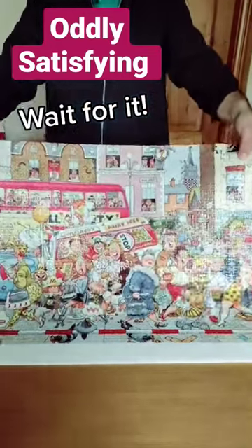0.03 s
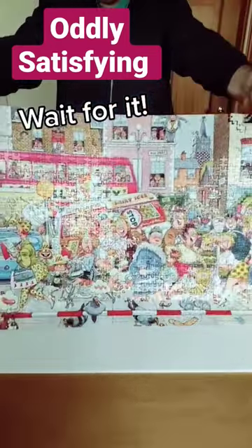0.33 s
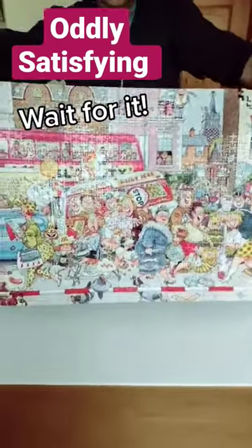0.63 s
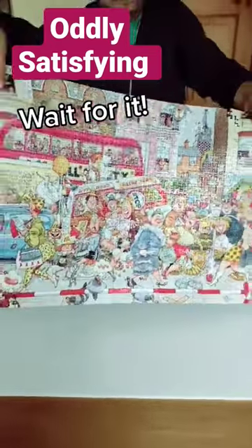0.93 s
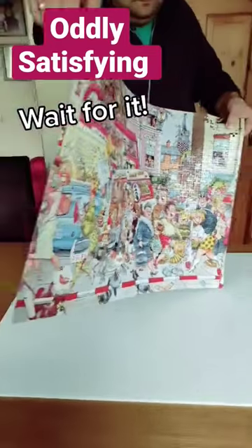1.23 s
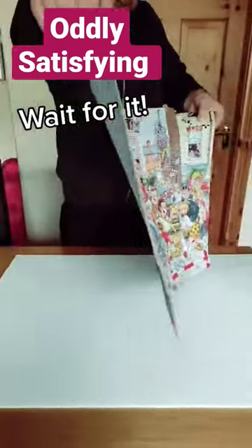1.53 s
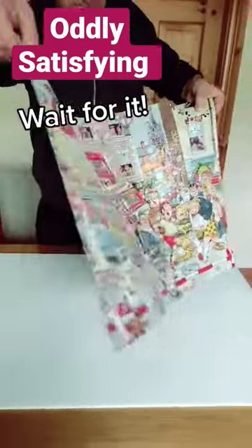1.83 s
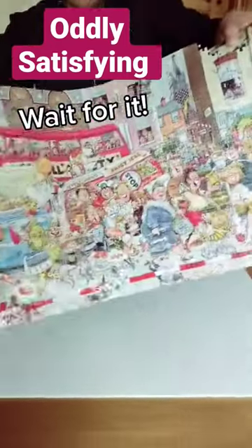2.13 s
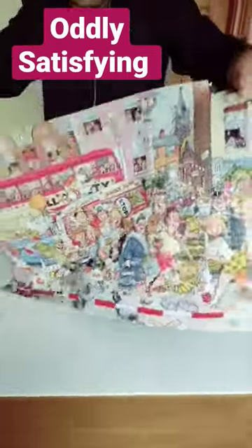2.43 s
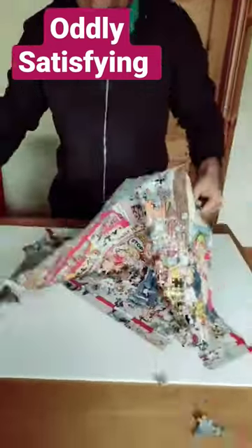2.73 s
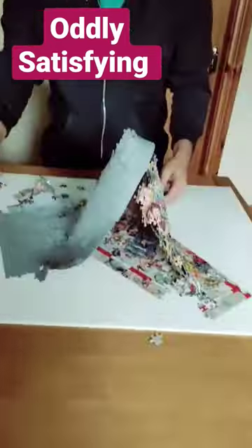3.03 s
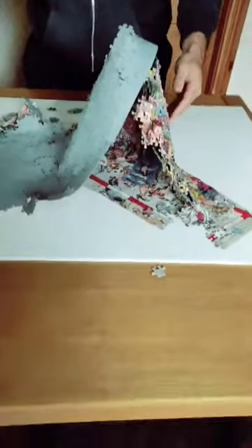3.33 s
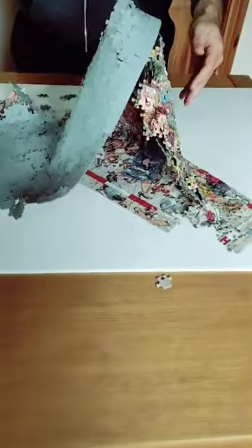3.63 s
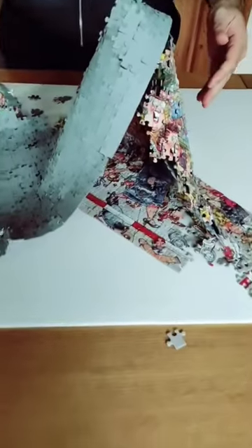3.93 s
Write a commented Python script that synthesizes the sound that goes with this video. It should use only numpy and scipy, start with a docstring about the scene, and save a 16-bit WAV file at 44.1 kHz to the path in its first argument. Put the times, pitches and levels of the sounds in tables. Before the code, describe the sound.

Jigsaw pieces clatter onto a nearby table indoors. Very quiet swishes and small squeaks of the bending puzzle come first, then it slumps down, with clumps shattering into clicks over light knocks and low drumming of the tabletop.

```python
"""Cardboard jigsaw breaking up on a table.

A finished jigsaw is lifted and swung in a small room, with faint swishes, dull rubbing and squeaks.
It slumps onto the table with a thud: clumps land and shatter into clicking pieces, loose pieces
trickle between them, slab edges knock, and the table top drums in its low modes under it all."""
import sys
import numpy as np
from scipy import signal
from scipy.io import wavfile
from scipy.ndimage import uniform_filter1d

SR = 44100
rng = np.random.default_rng(int(sys.argv[2]) if len(sys.argv) > 2 else 0)


def bounce(signal):
    """Save signal as a 16-bit WAV file at the path given by the first command-line argument."""
    frames = np.transpose(np.atleast_2d(signal))
    limited = np.clip(frames, -1, 1)
    pcm = np.round(limited * 32767).astype(np.int16)
    wavfile.write(sys.argv[1], SR, pcm)


N = 176400
T = np.arange(N) / SR

# Handling swishes. Each row: start, rise, release start and release length in seconds, level in dB.
SWISHES = [(0.0, 0.017, 1.15, .3, -72.5), (.18, 0.15, 0.62, .08, -64), (.22, 0.0088, 0.21, 0.043, -68),
           (.52, 0.02, 0.41, 0.062, -68), (1.334, 0.014, 1.61, 0.15, -63), (2.0, 0.16, 3, .1, -70.5),
           (2.525, 0.012, 3.4, 0.033, -68)]
# Swish spectrum. Each row: frequency in Hz, level in dB.
SWISH_SPECTRUM = [(100, -30), (400, -2), (1000, -1.5), (2000, 3), (4000, 1.5), (7000, 4.5), (10000, -3.5),
                  (15000, -4.5)]
# Rubbing of the flexing sheet. Each row: time in seconds, level in dB.
FLEX_ENVELOPE = [(0, -78), (.3, -63.5), (.8, -71), (1.2, -78), (1.55, -83), (1.68, -69.5), (1.85, -76),
                 (2.2, -70.5), (2.5, -69), (2.8, -57)]
# Rubbing spectrum. Each row: frequency in Hz, level in dB.
FLEX_SPECTRUM = [(30, -38), (60, -6), (100, -9.5), (330, 3), (600, -4.5), (1200, -29), (3000, -42)]
# Room background. Each row: frequency in Hz, relative level in dB.
BACKGROUND_SPECTRUM = [(15, -59), (25, -43.5), (86, -7), (309, -4.5), (475, -12.5), (655, -12),
                       (1670, -19.5), (15000, -32)]
# Squeaks of the bending sheet. Each row: start in seconds, starting pitch in Hz, level in dB.
SQUEAKS = [(.19, 2084, -74), (.82, 657, -68), (1.15, 629, -61)]
# Trickle of loose pieces. Each row: time in seconds, level in dB.
TRICKLE_ENVELOPE = [(2.449, -62), (2.68, -43), (2.86, -27.5), (2.89, -17), (3.0, -15), (3.1, -15),
                    (3.15, -7), (3.4, -11.5), (3.479, -18), (3.55, -20.5), (3.64, -16), (3.7, -8),
                    (3.85, -20), (3.92, -18), (4.0, -12.5)]
# Clump landings. Each row: start in seconds, strength in dB, 1/e decay in seconds,
# click centre in Hz, left minus right in dB.
CLUMPS = [(2.616, -22, 0.041, 2240, -2), (2.738, -13, 0.02, 2190, 1), (2.762, -14, 0.0048, 6250, 0),
          (2.850, -8.5, 0.0018, 4200, -3), (2.883, -5, 0.0033, 6200, -8.5), (2.932, -2, 0.037, 6550, -7.5),
          (2.994, 6, 0.057, 3740, -1), (3.018, 1, 0.013, 1570, -6.5), (3.1166, 8.5, 0.0066, 6400, -8),
          (3.126, 10, 0.0095, 5160, 2), (3.165, 6.5, 0.0085, 4860, -5), (3.2, 5, 0.028, 2820, -1),
          (3.238, 10, 0.017, 3480, -3.5), (3.26, 6, .016, 2900, -1.5), (3.302, 4.5, 0.019, 3900, -8),
          (3.32, 0.5, .01, 4520, -2), (3.4268, 8, 0.00089, 3400, -4), (3.436, 3.5, .03, 3660, 1),
          (3.497, -1, 0.005, 3080, 5), (3.571, -2.5, 0.013, 7150, -4.5), (3.579, -3, 0.0035, 1930, 3),
          (3.6579, 7.5, 0.0081, 7000, 0.5), (3.669, -1, 0.046, 8000, -5), (3.722, 2, 0.0054, 5930, -2),
          (3.768, 7, 0.0054, 7250, -6), (3.777, 5.5, 0.007, 7150, 3), (3.787, -0.5, 0.005, 1930, 8.5),
          (3.810, 0.5, 0.025, 7600, -3), (3.888, -4.5, 0.031, 3400, 1), (3.943, -4.5, 0.012, 2320, 5)]
# Click spectrum of a piece. Each row: frequency in Hz, level in dB.
PIECE_SPECTRUM = [(400, -5), (700, 10.5), (1250, 3.5), (1850, 8.5), (2900, 1.5), (4500, 2.5), (6800, 4.5),
                  (9000, -0.5), (11000, -7), (15000, -12)]
# Stereo balance of the clicks. Each row: frequency in Hz, left minus right in dB.
CLATTER_BALANCE = [(270, -1.0), (440, 2), (730, 8.5), (1210, -1.5), (1990, 3), (3290, -0.5), (5420, -3),
                   (8940, 4), (14700, 5.5)]
# Slabs falling flat. Each row: start in seconds, strength in dB, contact time in seconds.
THUDS = [(2.472, -45, 0.0022), (2.547, -45, 0.0011), (2.746, -28.5, .0068), (2.852, -28, 0.0048),
         (2.889, -17.5, 0.0068), (2.905, -12, 0.0051), (3.504, -18.5, .002), (3.6517, -13.5, .00035),
         (3.944, -23, 0.00087)]
# Table top modes. Each row: frequency in Hz, relative level in dB, T60 in seconds.
TABLE_MODES = [(92.5, -14.5, 0.41), (131, -6.5, 0.41), (151.4, -4, 0.24), (278.3, -4, 0.39),
               (375.5, -7, 0.33), (411.7, -2, 0.22), (694.4, 1.5, .15)]
# Patter on the table top. Each row: time in seconds, relative level in dB.
DRUM_ENVELOPE = [(2.6, -73.5), (2.7, -56), (2.76, -43), (2.84, -54), (2.91, -33), (3.1, -38.5), (3.26, -32),
                 (3.39, -34.5), (3.52, -32.5), (3.62, -39), (3.79, -35.5), (3.87, -39), (4.0, -39)]
# Patter spectrum. Each row: frequency in Hz, level in dB.
DRUM_SPECTRUM = [(30, -10), (95, -17), (135, 3.5), (210, 8.5), (500, 4), (680, 5), (1100, -1), (2000, -2.5),
                 (5000, -20)]
# Slab edges striking. Each row: start in seconds, strength in dB, pitch in Hz.
KNOCKS = [(2.947, -27.5, 299), (3.021, -30, 594), (3.504, -24, 396), (3.532, -23.5, 318),
          (3.634, -26.5, 646), (3.652, -21.5, 524), (3.662, -25, 744), (3.783, -25.5, 717),
          (3.943, -20, 454)]
# Diffuse sound field. Each row: frequency in Hz, left-right correlation.
STEREO_CORRELATION = [(60, 0.57), (130, 0.94), (260, 0.69), (500, 0.75), (1000, 0.043), (4000, 0.15),
                      (12000, 0.023)]
# Room decay. Each row: frequency in Hz, T60 in seconds.
ROOM_T60 = [(100, 1), (500, 0.64), (2000, 0.63), (6000, 0.45), (14000, 0.26)]

CONTACT_SPREAD_DB = 5.0


def from_db(db):
    """Decibels to gain."""
    return 10 ** (np.asarray(db) / 20)


def unit_rms(x):
    """Scale to unit power."""
    return x / np.sqrt(np.mean(x ** 2) + 1e-20)


def at_hz(points, hz):
    """Interpolate on a log-frequency axis."""
    points_hz, values = np.transpose(points)
    return np.interp(np.log(hz), np.log(points_hz), values)


def ring(x, hz, t60_s):
    """One mode: a unit click starts a decaying sine of height 1."""
    radius, angle = from_db(-60 / (t60_s * SR)), 2 * np.pi * hz / SR
    return signal.lfilter([0, np.sin(angle)], [1, -2 * radius * np.cos(angle), radius ** 2], x + 1e-18)


def noise_bands(size):
    """Yield (Hz, band): half-octave stereo noise, correlated in the bass."""
    edges_hz = 22 * 2 ** np.arange(0, 9.6, .5)
    white = rng.standard_normal((2, 2, size))
    for k, (low, high) in enumerate(zip(edges_hz, edges_hz[1:])):
        bandpass = signal.butter(2, [low, high], "band", fs=SR, output="sos")
        mid, side = signal.sosfilt(bandpass, white[k % 2])
        hz = np.sqrt(low * high)
        alike = at_hz(STEREO_CORRELATION, hz)
        yield hz, (np.sqrt(1 + alike) * mid + np.sqrt(1 - alike) * side * [[1], [-1]]) / np.sqrt(2)


def noise(spectrum):
    """Coloured stereo noise, unit power."""
    return unit_rms(sum(from_db(at_hz(spectrum, hz)) * band for hz, band in noise_bands(N)))


def flicker(spread_db, grain_s):
    """Gain that varies at random from grain to grain."""
    return from_db(spread_db * unit_rms(uniform_filter1d(rng.standard_normal(N), int(grain_s * SR))))


def handling():
    """Soft swishes as the sheet is lifted and swung."""
    swell = 0
    for start_s, rise_s, end_s, release_s, db in SWISHES:
        attack = np.clip((T - start_s) / rise_s, 0, 1)
        release = np.clip(1 - (T - end_s) / release_s, 0, 1)
        swell += from_db(db) * attack * release
    return swell * flicker(spread_db=.5, grain_s=.014) * noise(SWISH_SPECTRUM)


def flexing():
    """Dull rubbing of the bending sheet."""
    return from_db(np.interp(T, *np.transpose(FLEX_ENVELOPE))) * noise(FLEX_SPECTRUM)


def squeaks(rise_s=.04, decay_s=.11, t60_s=.057, overtone_ratio=1.5, overtone_db=-9, glide_per_s=.6):
    """Friction in the joints rings two resonances that glide up slightly."""
    friction = np.diff(rng.standard_normal(N + 1))
    out = 0
    for start_s, hz, db in SQUEAKS:
        age_s = T - start_s
        overtone = ring(friction, hz * overtone_ratio, t60_s) / overtone_ratio
        tone = unit_rms(ring(friction, hz, t60_s) + from_db(overtone_db) * overtone)
        gliding = np.interp(T + .5 * glide_per_s * age_s ** 2, T, tone, right=0)
        stroke = np.clip(age_s / rise_s, 0, 1) * np.exp(-np.maximum(age_s - rise_s, 0) / decay_s)
        out += from_db(db) * stroke * gliding
    return out


def trickle_contacts(rate_per_s=400, centre_hz=3630, pan_db=-1):
    """Loose pieces land at random. Returns times, gains, centres, pans."""
    time_s = rng.uniform(0, N / SR, rate_per_s * N // SR)
    size = unit_rms(from_db(CONTACT_SPREAD_DB * np.clip(rng.standard_normal(len(time_s)), -2, 2)))
    level_db = np.interp(time_s, *np.transpose(TRICKLE_ENVELOPE), left=-np.inf)
    return np.array(np.broadcast_arrays(time_s, size * from_db(level_db), centre_hz, pan_db))


def clump_contacts(rate_per_s=1100, span_s=.12):
    """A clump lands, then its pieces touch down ever more weakly. Returns times, gains, centres, pans."""
    contacts, count = [], int(rate_per_s * span_s)
    for start_s, db, decay_s, centre_hz, pan_db in CLUMPS:
        gaps_s = rng.exponential(1 / rate_per_s, count)
        age_s = np.cumsum(gaps_s) - gaps_s[0]
        size = from_db(CONTACT_SPREAD_DB * np.clip(rng.standard_normal(count), -2, 1))
        size *= np.exp(-age_s / decay_s)
        gain = from_db(db) * size / np.linalg.norm(size)
        contacts.append(np.broadcast_arrays(start_s + age_s, gain, centre_hz, pan_db))
    return np.hstack(contacts)


def piece_clicks(mode_q=5.17, mode_spread_db=4.5, pan_spread_db=3.5, lag_spread_s=.00007):
    """Each contact rings short cardboard resonances in its own mix, from its own place."""
    time_s, gain, centre_hz, pan_db = np.hstack([clump_contacts(), trickle_contacts()])
    count = len(time_s)
    pan_db = pan_db + pan_spread_db * rng.standard_normal(count)
    lag_s = lag_spread_s * rng.standard_normal(count)
    edge_ratio = 1 + .5 / mode_q
    denormal_guard = 1e-12 * np.cos(np.arange(N))
    out = 0
    for hz in np.geomspace(450, 14500, 30):
        mix = unit_rms(from_db(mode_spread_db * rng.standard_normal(count))) * rng.choice([-1, 1], count)
        octaves = np.log2(hz / centre_hz)
        loss_db = np.maximum(6 * octaves, -7 * octaves)
        strength = gain * mix * from_db(at_hz(PIECE_SPECTRUM, hz) - loss_db)
        balance_db = pan_db + at_hz(CLATTER_BALANCE, hz)
        clicks = []
        for side in (1, -1):
            arrival = np.maximum((time_s - side * lag_s / 2) * SR, 0).astype(int)
            clicks.append(np.bincount(arrival, strength * from_db(side * balance_db / 2), N)[:N])
        mode = signal.butter(2, [hz / edge_ratio, hz * edge_ratio], "band", fs=SR, output="sos")
        out += signal.sosfilt(mode, np.array(clicks) + denormal_guard)
    return out


def room(x, onset_s=.0011, early_db=-2.5, early_decay_s=.012):
    """Early reflections off table and walls, then a diffuse tail that dies sooner in the treble."""
    t = T[:SR // 2]
    tail = sum(band * from_db(-60 * t / at_hz(ROOM_T60, hz)) for hz, band in noise_bands(len(t)))
    tail *= 1 + from_db(early_db) * np.exp(-t / early_decay_s)
    tail *= np.clip(t / onset_s - .5, 0, 1)
    return signal.fftconvolve(x, unit_rms(tail) / np.sqrt(len(t)), axes=1)[:, :N]


def scattered_room(x, spots=3, spot_s=.06):
    """The landing spot wanders over the table; each spot has its own reflections."""
    distances = [np.abs((T / spot_s + k) % spots - spots / 2) for k in range(spots)]
    return sum(room(x * np.sqrt(np.clip(1 - distance, 0, 1))) for distance in distances)


def table_top(push, ring_db=-51, low_cut_hz=87):
    """The top booms in its low modes and radiates no deep bass."""
    modes = sum(from_db(db) * ring(push, hz, t60_s) for hz, db, t60_s in TABLE_MODES)
    highpass = signal.cheby1(8, .5, low_cut_hz, "high", fs=SR, output="sos")
    return signal.sosfilt(highpass, push + from_db(ring_db) * modes)


def thuds(room_db=-8.5):
    """Slabs fall flat, each a brief push on the table top."""
    push = sum(from_db(db) * np.sin(np.pi * np.clip((T - start_s) / contact_s, 0, 1)) ** 2
               for start_s, db, contact_s in THUDS)
    top = table_top(push) * np.ones((2, 1))
    return top + from_db(room_db) * scattered_room(top)


def drumming(gain_db=-2, bypass_db=-8.5):
    """Countless soft landings merge into a low patter of the table top."""
    level_db = gain_db + np.interp(T, *np.transpose(DRUM_ENVELOPE), left=-np.inf)
    patter = from_db(level_db) * flicker(spread_db=2.5, grain_s=.00625) * noise(DRUM_SPECTRUM)
    return table_top(patter) + from_db(bypass_db) * patter


def knocks(t60_s=.035, room_db=-5):
    """A slab's edge strikes, rings at its own pitch and shakes the table top."""
    slabs = sum(from_db(db) * ring(signal.unit_impulse(N, int(start_s * SR)), hz, t60_s)
                for start_s, db, hz in KNOCKS)
    top = table_top(slabs) * np.ones((2, 1))
    return top + from_db(room_db) * room(top)


def heap(x, hz=1890, width_hz=220, hollow_db=-4.5, start_s=3.13, formed_s=3.77):
    """The folded sheet forms a resonant hollow that colours the later clicks."""
    hollow = signal.lfilter(*signal.iirpeak(hz, hz / width_hz, fs=SR), x)
    return x + from_db(hollow_db) * hollow * np.interp(T, [start_s, formed_s], [0, 1])


def scene(background_db=-66.5):
    """Clatter, table and handling in a quiet room."""
    clatter = heap(piece_clicks())
    collapse = clatter + scattered_room(clatter) + thuds() + knocks() + drumming()
    sheet = handling() + squeaks() + flexing()
    return collapse + sheet + from_db(background_db) * noise(BACKGROUND_SPECTRUM)


def record(dry, ceiling=.6, cutoff_hz=15100):
    """Soft clip, then steep low-pass."""
    rounded = ceiling * np.tanh(dry / ceiling)
    return signal.sosfilt(signal.ellip(10, .3, 80, cutoff_hz, fs=SR, output="sos"), rounded)


dry = scene()
out = record(dry)
bounce(out)
```